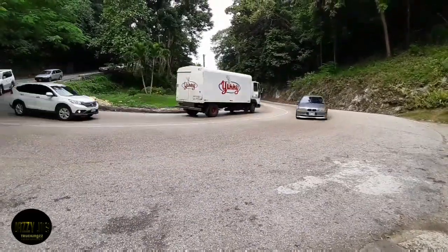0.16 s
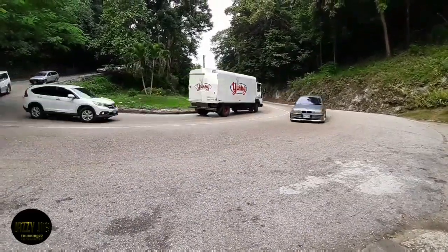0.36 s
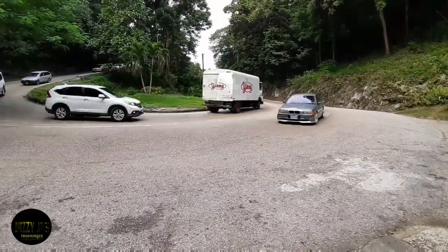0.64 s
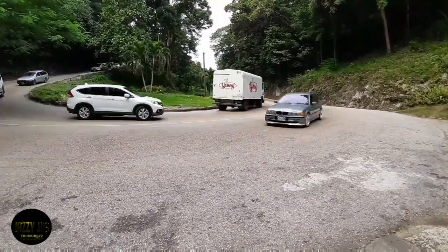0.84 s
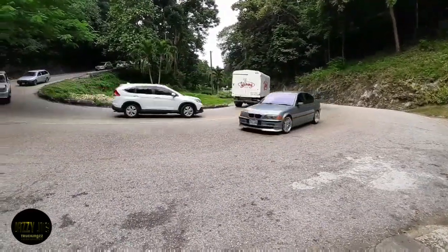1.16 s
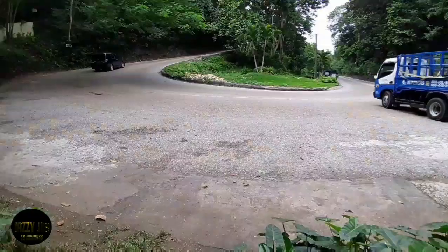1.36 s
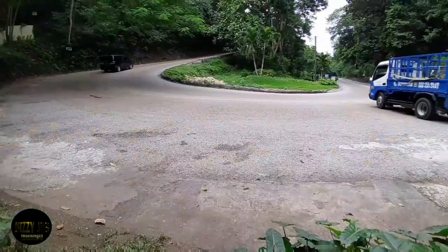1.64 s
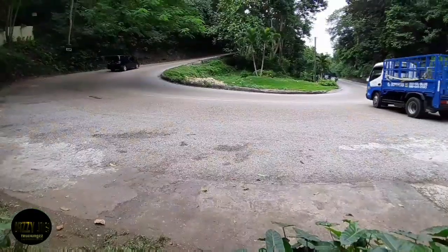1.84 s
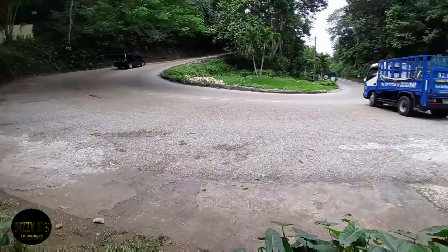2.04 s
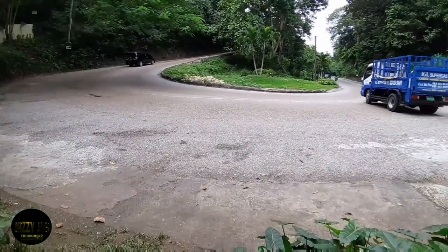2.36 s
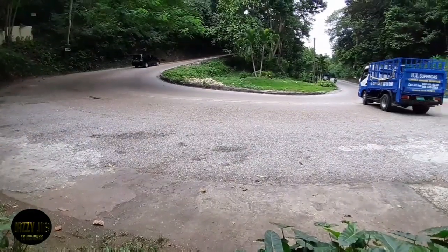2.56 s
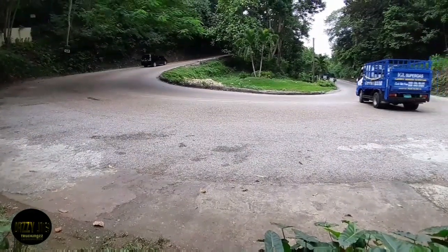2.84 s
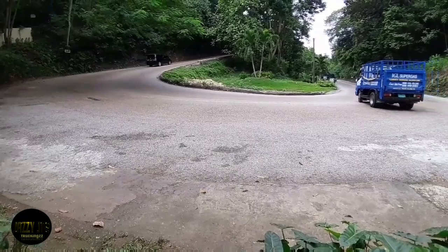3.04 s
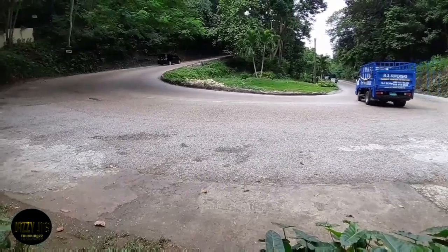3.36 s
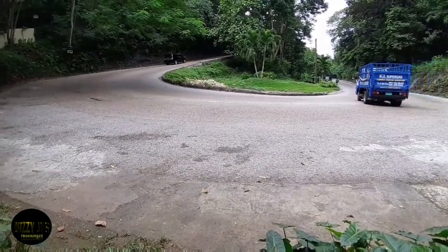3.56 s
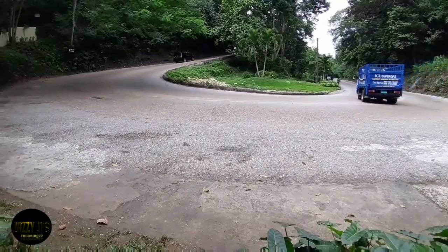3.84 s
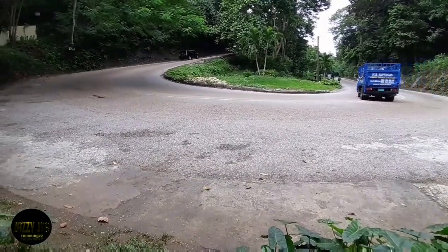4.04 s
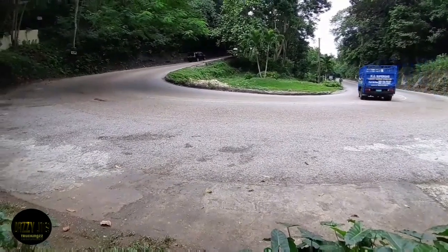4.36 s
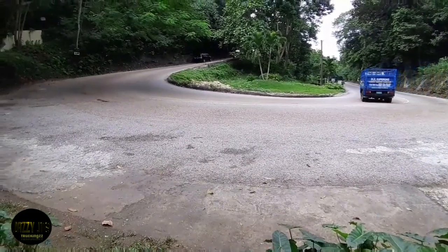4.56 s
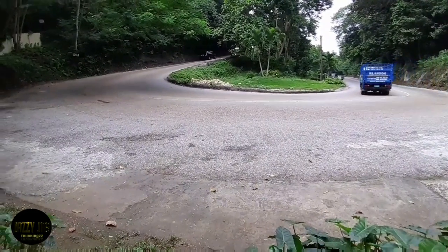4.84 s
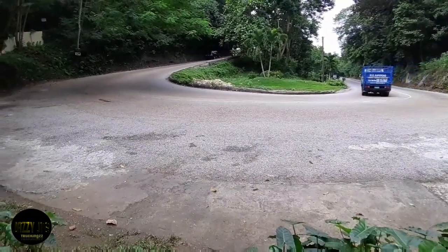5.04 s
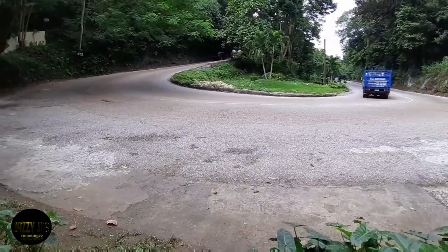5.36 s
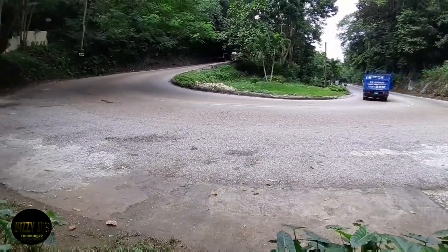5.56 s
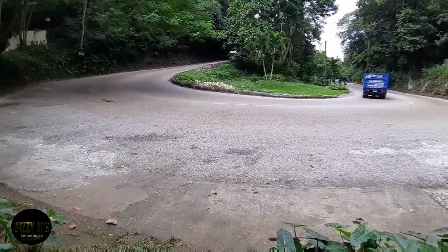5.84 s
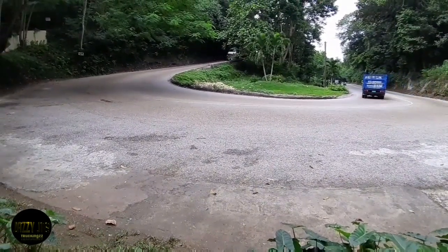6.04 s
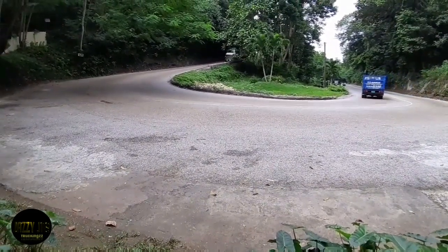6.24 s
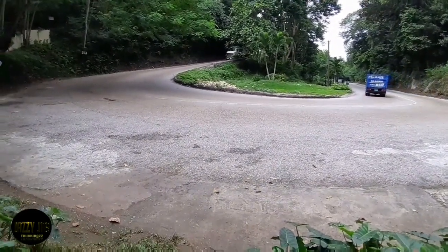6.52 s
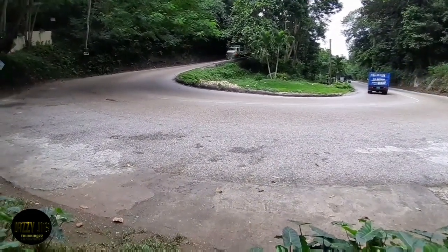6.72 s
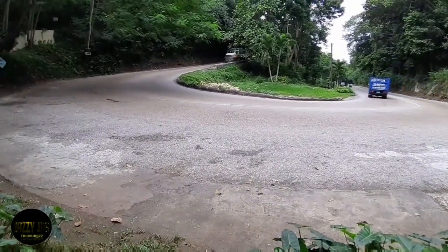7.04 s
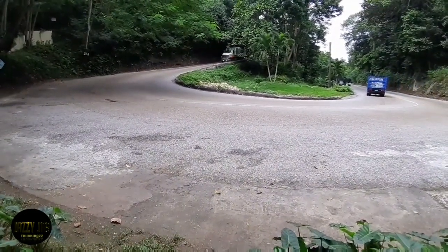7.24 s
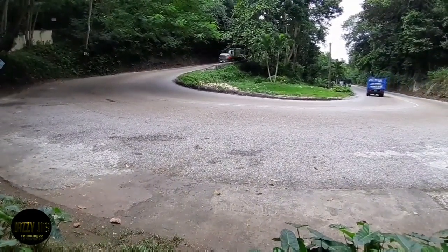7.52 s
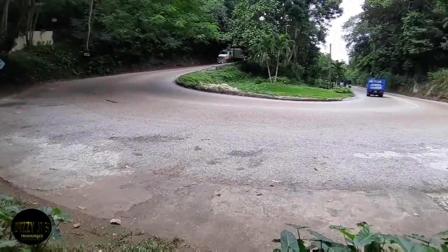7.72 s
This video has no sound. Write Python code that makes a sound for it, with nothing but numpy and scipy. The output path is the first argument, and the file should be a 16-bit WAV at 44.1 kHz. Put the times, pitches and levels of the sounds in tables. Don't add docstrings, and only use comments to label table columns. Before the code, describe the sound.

From 0 to 1.2 s, muted traffic roar and low engine hums, weighted left, fade to silence. At about 1.24 s a hard change: a close diesel truck engine-braking, its uneven, throaty burble around 65 firings a second slowing to 49 by the end, with body booms and broad tyre roar. Another engine revs up to 2.5 s, is loudest near 3.2 s, and dies by 4 s; a second rev follows from 4.1 to 5.2 s. Small brake squeak at 1.85 s, sharp knock at 2.4 s, low squeal from 2.75 s, chirp and air puff at 2.94 s, squeak at 4.4 s. At 5.05 and 5.19 s, two loud brassy air-horn toots, each a tenth of a second, echo through trees for under a second. The traffic abruptly drops, then creeps back; the receding truck hums low, another engine climbs in pitch, knocks tick at 6.5 and 6.9 s, and the level rises from 7.5 s.

```python
import sys
import numpy as np
from scipy import signal
from scipy.fft import rfft, irfft, next_fast_len
from scipy.io import wavfile

SR = 44100
rng = np.random.default_rng(int(sys.argv[2]) if len(sys.argv) > 2 else 0)


def wav_record(signal):
    frames = np.transpose(np.atleast_2d(signal))
    bounded = np.clip(frames, -1, 1)
    quanta = np.round(bounded * 32767).astype(np.int16)
    wavfile.write(sys.argv[1], SR, quanta)


def attenuation_scalar(level_db):
    decades = np.asarray(level_db, float) / 20
    return 10 ** decades


N = 347949
T = np.arange(N) / SR
CUT_S = 1.234
DUCK_S = 5.05


def rms_one(x):
    return x / np.sqrt(np.mean(x ** 2) + 1e-20)


def in_time(rows):
    s, *columns = np.transpose(rows)
    return [np.interp(T, s, c) for c in columns]


def sounding(rows, fade_s=0.022):
    inside_s = np.minimum(T - rows[0][0], rows[-1][0] - T)
    return np.clip(inside_s / fade_s + 1, 0, 1)


def at_hz(points, hz):
    point_hz, value = np.array(points).T
    return np.interp(np.log(hz + 1), np.log(point_hz), value)


def drift(rate):
    r = np.exp(-80 * np.pi * rate / SR)
    slow = signal.lfilter([1], [1, -2 * r, r * r], rng.standard_normal(N // 40 + 2002))[2000:]
    return np.interp(np.arange(N) / 40, np.arange(len(slow)), rms_one(slow))


def resonance(x, hz, width_hz):
    r = np.exp(-np.pi * width_hz / SR)
    feedback = [1, -2 * r * np.cos(2 * np.pi * hz / SR), r * r]
    return signal.lfilter([(1 - r * r) / 2, 0, (r * r - 1) / 2], feedback, x)


def low_pass(x, order, hz):
    return signal.sosfilt(signal.butter(order, hz, fs=SR, output="sos"), x)


def high_pass(x, order, hz):
    return signal.sosfilt(signal.butter(order, hz, "high", fs=SR, output="sos"), x)


def tones(hz, orders, waver_db):
    turns = np.cumsum(hz) / SR
    out = 0
    for multiple, db in orders:
        gain = attenuation_scalar(db + waver_db * drift(3.9)) * np.sqrt(2)
        out = out + gain * np.sin(2 * np.pi * (multiple * turns + rng.random()))
    return out


def engine(rows, orders, waver_db):
    hz, tone_db = in_time(rows)
    return sounding(rows) * attenuation_scalar(tone_db) * tones(hz, orders, waver_db)


def roar(levels, colours, far_share, lean, lag_s, lag_from_hz, throb, patchy_db):
    # hz, likeness (0-1)
    likeness = [(100, 0.98), (330, 0.85), (500, 0.59), (800, 0.77), (1100, 0.08), (2500, 0.35), (5000, 0),
                (15000, 0)]
    size = next_fast_len(N)
    hz = np.fft.rfftfreq(size, 1 / SR)
    shared, left, right = rfft(rng.standard_normal((3, size)))
    alike = np.clip(at_hz(likeness, hz), 0, 1)
    late = np.exp(-2j * np.pi * hz * lag_s * np.clip(hz / lag_from_hz - .8, 0, .4) / 0.43)
    pair = np.sqrt(alike) * shared * np.array([np.ones_like(late), late])
    pair = pair + np.sqrt(1 - alike) * np.array([left, right])
    pair = pair * attenuation_scalar(np.outer([.5, -.5], at_hz(lean, hz)))
    level_db, rumble_db, hiss_db = levels
    # low_hz, high_hz, range_hz whose power sets the level, level_db
    bands = [(20, 487, (174, 470), rumble_db), (485, 1010, (830, 4200), 0),
             (1500, 3500, (500, 3000), 0), (3500, 20000, (4000, 15000), hiss_db)]
    out = 0
    for low, high, gauge, rel_db in bands:
        band = np.sqrt(1 / (1 + (low / (hz + 1)) ** 8) - 1 / (1 + (high / (hz + 1)) ** 8))
        gain = attenuation_scalar(level_db + rel_db + patchy_db * drift(6))
        gain = gain * (1 + throb * (low <= 485))
        for colour, share in zip(colours, [1 - far_share, far_share]):
            shape = attenuation_scalar(at_hz(colour, hz))
            inside = (hz > gauge[0]) & (hz < gauge[1])
            gauged = np.sqrt(2 * np.sum(shape[inside] ** 2) / size)
            out = out + gain * np.sqrt(share) * irfft(pair * band * shape / gauged, size)[:, :N]
    return out


def first_view():
    # hz, level_db (per Hz)
    first_colour = [(35, -14), (60, -20), (120, -11.5), (250, -10.5), (410, -17), (730, -20.5),
                    (1000, -16.5), (1400, -16.5), (1750, -24), (2500, -30), (3300, -37), (8000, -51),
                    (15800, -61)]
    # hz, difference_db
    first_lean = [(60, 8), (180, 1), (550, -1), (1650, 6.5), (4970, 21.5), (15000, 44.5)]
    # start_s, firing_hz, level_db
    van = [
        (0, 44.3, -39),
        (1.2, 43.3, -39),
    ]
    car = [
        (0, 62, -41),
        (.2, 60.5, -40),
        (.45, 56.5, -39),
        (.75, 59, -40),
        (1.2, 63.5, -41),
    ]
    # multiple, level_db
    van_orders = [(2, -7), (3.001, -5), (4, -14), (4.998, 0.5), (6.671, -8.5)]
    car_orders = [(1, 0.2), (2, 1.8)]
    fade_end_s, fade_gate_s, draw_away_db_per_s = 1.195, 1.183, 2
    out = roar((-40, 3.5, -23), [first_colour], 0, first_lean, 0.00034, 200, 0, patchy_db=1.9)
    out += engine(van, van_orders, waver_db=3.5) + engine(car, car_orders, waver_db=1.0)
    tyres = rms_one(resonance(rng.standard_normal((2, N)), hz=1280, width_hz=170))
    tyres = tyres * attenuation_scalar([[3.0], [-3.0]])
    out += attenuation_scalar(-53.5 + 12 * np.minimum(T, fade_end_s)) * tyres
    fade = np.clip(1 - T / fade_end_s, 0, 1) * attenuation_scalar(-draw_away_db_per_s * T)
    return out * fade * (T < fade_gate_s)


def bend_traffic(far_share, firing_throb):
    # hz, level_db (per Hz)
    near_colour = [(60, -12), (140, -7.5), (300, -10.5), (400, -18.5), (520, -16), (620, -19.5),
                   (860, -11.5), (1130, -21), (1350, -13.5), (1780, -21), (2200, -20), (3070, -30.5),
                   (7400, -41), (14500, -51)]
    far_colour = [(60, -14.5), (140, -7.5), (290, -8.5), (440, -15), (610, -18.5), (930, -8), (1290, -13),
                  (1700, -17), (2150, -18), (3400, -36), (7200, -42.5), (8200, -49), (15800, -54)]
    # hz, difference_db
    bend_lean = [(60, -1), (120, -1), (240, -2.5), (480, -0.5), (950, -2.5), (1890, -3.5), (3770, -2.5),
                 (7520, -2.5), (15000, 0)]
    # start_s, level_db
    traffic = [
        (1.24, -34),
        (1.6, -35.5),
        (2.9, -36),
        (3.4, -38),
        (4.0, -38),
        (4.4, -36),
        (4.7, -39.5),
        (5.05, -39.5),
    ]
    rumble_db = [0.54, 3.5]
    hiss_db = [-12, -9]
    levels = (in_time(traffic)[0],
              np.interp(far_share, [0, 1], rumble_db), np.interp(far_share, [0, 1], hiss_db))
    throb = (.18 + .2 * far_share) * firing_throb
    return roar(levels, [near_colour, far_colour], far_share, bend_lean, 0.00041, 1170, throb, patchy_db=.5)


def other_engines():
    # start_s, firing_hz, level_db
    climbing = [
        (4.9, 62, -41),
        (5.7, 63.3, -37),
        (6.7, 72.5, -34),
        (7.2, 76.5, -42),
        (7.89, 81, -42),
    ]
    revving = [
        (1.24, 86, -41),
        (1.65, 99, -38),
        (1.97, 102.5, -37),
        (2.25, 112, -33.5),
        (2.5, 124.5, -35.5),
        (2.65, 124.5, -33),
        (3.17, 102.5, -27),
        (3.47, 89.5, -37.5),
        (4.05, 77, -45),
    ]
    revving_again = [
        (4.1, 97, -48),
        (4.33, 108.5, -35.5),
        (4.75, 110, -35.5),
        (5.0, 116, -37),
        (5.2, 119, -44),
    ]
    # multiple, level_db
    rev_orders = [(1, 0), (2, -22)]
    climb_orders = [(1, 1), (2, -21), (3, -7)]
    out = engine(climbing, climb_orders, waver_db=1.5)
    out += engine(revving, rev_orders, waver_db=.7)
    return out + engine(revving_again, rev_orders, waver_db=1.0)


def engine_booms():
    # start_s, pitch_hz, level_db
    boom = [(2.2, 213, -46), (2.5, 211.5, -39), (4.0, 206.5, -41), (4.5, 199, -40), (4.9, 197, -40),
            (5.1, 195, -44)]
    close_boom = [(1.24, 265, -35), (2.0, 259, -37), (2.7, 250, -39), (2.95, 248, -48)]
    return engine(boom, [(1, 0), (1.045, -6)], waver_db=3.0) + engine(close_boom, [(1, 0)], waver_db=2.0)


def far_boom():
    # start_s, pitch_hz, level_db
    rolling_off = [(5.7, 158, -48), (6.1, 156.5, -42), (6.7, 153.5, -42), (7.5, 149, -41), (7.89, 148, -42)]
    return engine(rolling_off, [(1, 0)], waver_db=2.0)


def small_sounds():
    # start_s, length_s, pitch_hz, level_db
    squeaks = [
        (.925, .11, 9250, -72),
        (1.85, .065, 9250, -62),
        (2.94, .055, 8750, -58),
        (2.94, .04, 9600, -63),
        (2.94, .044, 10400, -64),
        (2.94, .03, 11200, -63),
        (2.94, .04, 12800, -67),
        (2.95, .05, 5900, -55),
        (4.42, .06, 8950, -62),
        (2.755, .4, 1350, -49),
    ]
    # start_s, peak_db
    ticks = [
        (2.409, -25),
        (3.649, -45),
        (6.524, -28),
        (6.934, -29.5),
    ]
    puff_s, puff_decay_s, puff_db = 2.94, .04, -54
    out = np.zeros(N)
    for s, length_s, hz, db in squeaks:
        i, size = int(s * SR), int(length_s * SR)
        swell = 1 - np.abs(np.linspace(-1, 1, size)) ** 3
        ringing = rms_one(resonance(rng.standard_normal(SR // 2), hz, 70))[-size:]
        out[i:i + size] += attenuation_scalar(db) * swell * ringing
    puff = (T > puff_s) * np.exp(-np.abs(T - puff_s) / puff_decay_s)
    out += attenuation_scalar(puff_db) * puff * np.diff(rng.standard_normal(N + 1))
    clicks = np.zeros(N) + 1e-18
    for s, peak_db in ticks:
        clicks[round(s * SR)] = attenuation_scalar(peak_db + 30)
    return out + resonance(resonance(clicks, 900, 600), 900, 600)


def truck(far_share):
    # start_s, firing_hz
    speed = [
        (1.24, 65),
        (1.95, 63.7),
        (3.15, 60.2),
        (4.35, 57.6),
        (5.55, 53.3),
        (6.75, 51),
        (7.89, 49.2),
    ]
    # multiple, level_db
    firing_orders = [(1, -6), (2, -15.5), (3, -18.5)]
    cylinders_db = [5, -7, 2, -3, 4, -10]
    # start_s, level_db
    effort = [(1.24, -32.5), (1.6, -34), (2, -31.5), (2.6, -31.5), (2.9, -30.5), (3.8, -30), (4.3, -31),
              (4.7, -28.5), (5.04, -32), (5.6, -34.5), (6.1, -35.5), (6.6, -36.5), (7.1, -35), (7.89, -33)]
    # pitch_hz, width_hz
    pipes = [(148, 30), (205, 44), (268, 55)]
    pipe_level_db = [-5, -1.5, -0.5]
    pipe_loss = [3.5, 0.46, 2.35]
    lift_s, lift_length_s = 2.74, .24
    hz, effort_db = in_time(speed)[0], in_time(effort)[0]
    uneven = np.interp(far_share, [0, 1], [0.86, 0.49])
    engaged = np.clip(2 * np.abs(T - lift_s) / lift_length_s, 0, 1)
    count = np.cumsum(hz * (1 + .006 * drift(2.5))) / SR
    fired = np.flatnonzero(np.diff(np.floor(count)))
    pattern_db = np.array(cylinders_db)[count[fired + 1].astype(int) % 6] * uneven[fired]
    blows = np.zeros(N)
    blows[fired] = attenuation_scalar(pattern_db + 1.3 * rng.standard_normal(len(fired)))
    blows[fired] -= .55 * uneven[fired] * np.mean(blows[fired])
    out = engaged * attenuation_scalar(effort_db) * tones(hz, firing_orders, waver_db=2.5)
    rolled_s = np.minimum(T, DUCK_S) - CUT_S
    for (pipe_hz, width_hz), db, loss in zip(pipes, pipe_level_db, pipe_loss):
        ringing = resonance(resonance(blows, pipe_hz, width_hz), pipe_hz, width_hz)
        out += attenuation_scalar(effort_db + db - loss * rolled_s) * rms_one(ringing)
    return out, np.cos(2 * np.pi * count)


def toot_shape(open_s, peak_db, reed_hz):
    jump_s, jump_db, swell_s, sag_db_per_s = 0.011, -5.0, 0.036, 63
    drain_s, drain_db = 0.032, -20.5
    held_db = -sag_db_per_s * (open_s - swell_s)
    t = np.arange(int((open_s + 1.5 * drain_s) * SR)) / SR
    pressure_db = np.interp(t, [0, jump_s, swell_s, open_s, open_s + drain_s, open_s + 0.84 * drain_s],
                            [-32, jump_db, 0, held_db, held_db + drain_db, -45])
    hz = reed_hz + 3.0 * np.exp(-t / 0.013) - 26 * (t - swell_s)
    return hz, peak_db + pressure_db


def horn():
    # start_s, open_s, peak_db, reed_hz
    toots = [
        (5.05, 0.099, -15.5, 262.5),
        (5.194, 0.099, -16.5, 263.2),
    ]
    # multiple, level_db
    long_trumpet = [(1, -19), (2, -13), (3, -11.5), (4, -11.5), (5, -15.5), (6, -22), (7, -9.5), (8, -21),
                    (9, -16), (10, -16.5), (14, -21.5), (20, -31.5), (30, -35), (40, -39), (56, -37)]
    # multiple, level_db
    short_fall = [(1, -1), (2, 1), (3, 2), (4, -10), (11, -15.5), (13, -29.5), (29, -24), (31, -33)]
    # multiple, first_toot_db, second_toot_db
    short_favoured = [(5, -5.5, -9), (6, -18, -9.5), (7, -21, -17), (8, -6.5, -6), (10, -15.5, -18),
                      (14, -21, -16.5), (15, -21.5, -17.5), (19, -36, -21), (20, -31, -14), (21, -38, -21),
                      (23, -16, -17), (27, -22, -21), (28, -16, -18), (29, -22, -25)]
    long_ratio = .7335
    out = np.zeros((2, N))
    long_orders = [(k, np.interp(k, *np.transpose(long_trumpet))) for k in range(1, 57)]
    for n, (s, open_s, peak_db, reed_hz) in enumerate(toots):
        favoured = {round(k): dbs[n] for k, *dbs in short_favoured}
        short_orders = [(k, favoured.get(k, np.interp(k, *np.transpose(short_fall)))) for k in range(1, 57)]
        hz, pressure_db = toot_shape(open_s, peak_db, reed_hz)
        i = int(s * SR)
        j = i + len(hz)
        turns = np.cumsum(hz * (1 + 0.0008 * drift(35)[i:j])) / SR
        for ratio, trumpet in [(1, short_orders), (long_ratio, long_orders)]:
            for k, db in trumpet:
                high = np.clip(k * ratio * hz[0] / 1200 - .3, 0, 1)
                swell_db = (pressure_db + 23.5) * 0.071 * np.log2(k)
                waver = np.interp(np.linspace(0, 7, j - i), np.arange(8), rng.standard_normal(8))
                level_db = pressure_db + db + swell_db + 3 * high * waver
                apart_rad, apart_db = high * rng.uniform(-1.7, 1, 2) * [1.6, 3.5]
                phase = 2 * np.pi * k * (ratio * turns + 0.0312 * np.sqrt(k))
                phase = phase + (k * ratio > 12) * rng.uniform(0, 3.7) + np.outer([.5, -.5], apart_rad)
                out[:, i:j] += attenuation_scalar(level_db + np.outer([.5, -.5], apart_db)) * np.sin(phase)
        air = signal.lfilter([.6], [1, -.5], rng.standard_normal((2, j - i)))
        out[:, i:j] += attenuation_scalar(pressure_db - 26) * air
    return out


def hillside(x):
    # delay_s, level_db, dull_above_hz
    slopes = [
        (.155, -28, 4000),
        (.3, -27, 3000),
        (.46, -30, 2600),
        (.61, -30, 2530),
    ]
    woods_db, woods_t60_s, woods_cut_hz = -9, 0.77, 20800
    length = int(1.2 * SR)
    fading = attenuation_scalar(-60 * np.arange(length) / SR / woods_t60_s)
    onset = np.clip(np.arange(length) / (0.012 * SR), 0, 1)
    scatter = low_pass(rng.standard_normal((2, length)) * fading * onset, 1, woods_cut_hz)
    scatter[1] += low_pass(scatter[0] - scatter[1], 2, 700)
    answer = attenuation_scalar(woods_db) * scatter / np.sqrt(np.sum(scatter ** 2, axis=1, keepdims=True))
    out = signal.fftconvolve(x[None], answer, axes=1)[:, :N]
    out += 1.03 * high_pass(out, 1, 2500)
    swaying = T + .00012 * drift(18)
    out = np.array([np.interp(swaying, T, side) for side in out])
    for delay_s, db, cut_hz in slopes:
        dull = attenuation_scalar(db) * low_pass(x, 2, cut_hz)
        out += [np.roll(dull, int(delay_s * SR) + lag) for lag in rng.integers(0, 30, 2)]
    return out


def gain_control():
    attack_s, duck_db, hold_s = 0.067, -5, 2.44
    creep_db_per_s, release_db_per_s = 0.76, 9
    since = T - DUCK_S
    back_db = creep_db_per_s * since + release_db_per_s * np.maximum(since - hold_s, 0)
    return attenuation_scalar(np.clip(since / attack_s, 0, 1) * np.minimum(duck_db + back_db, 0))


def scene():
    far_share = np.clip((T - 4.6) / 1.12, 0, 1)
    braking, firing_throb = truck(far_share)
    engines = braking + other_engines() + engine_booms()
    bend = bend_traffic(far_share, firing_throb) + engines * attenuation_scalar([[-.7], [.7]])
    bend = bend * gain_control()
    toots = horn()
    bend += toots * attenuation_scalar([[-1.6], [1.4]]) + hillside(toots.mean(axis=0))
    bend += far_boom()
    return first_view() + bend * (T > CUT_S) + small_sounds()


def band_limit(x):
    return signal.sosfilt(signal.butter(12, 16130, fs=SR, output="sos"), x)


def record(dry):
    thin = high_pass(dry, 4, 46)
    rounded = 2 * np.tanh(thin / 2)
    top_cut = signal.cheby2(12, 70, 15850 + 800, fs=SR, output="sos")
    mix = signal.sosfilt(top_cut, rounded)
    return band_limit(mix)


dry = scene()
out = record(dry)
wav_record(out)
```